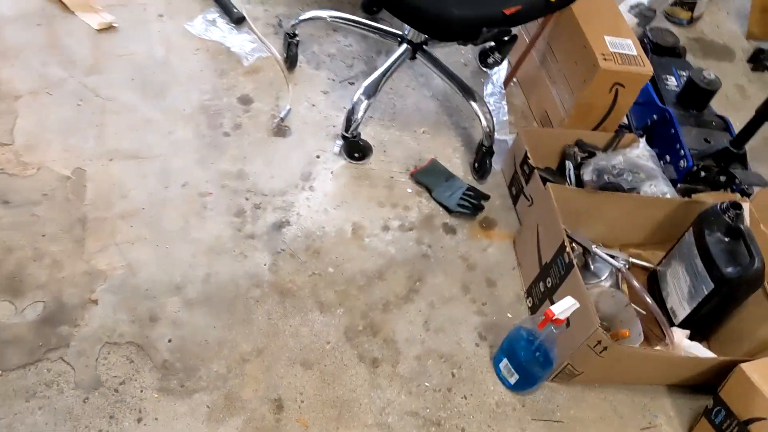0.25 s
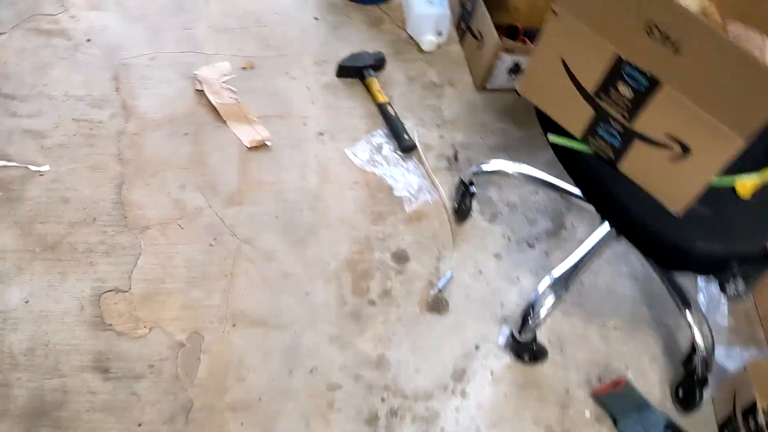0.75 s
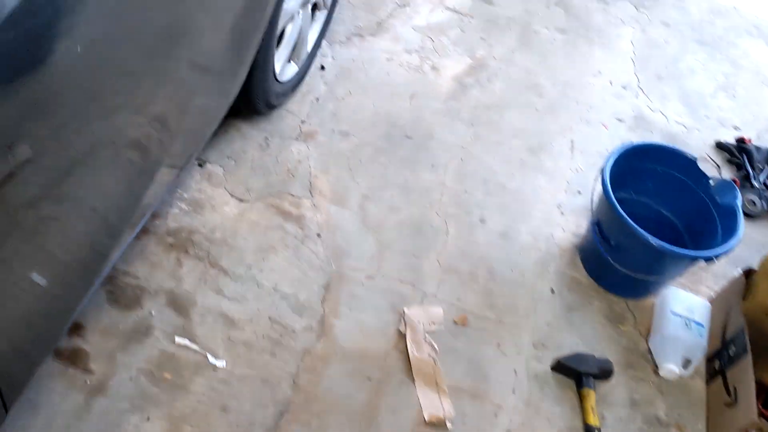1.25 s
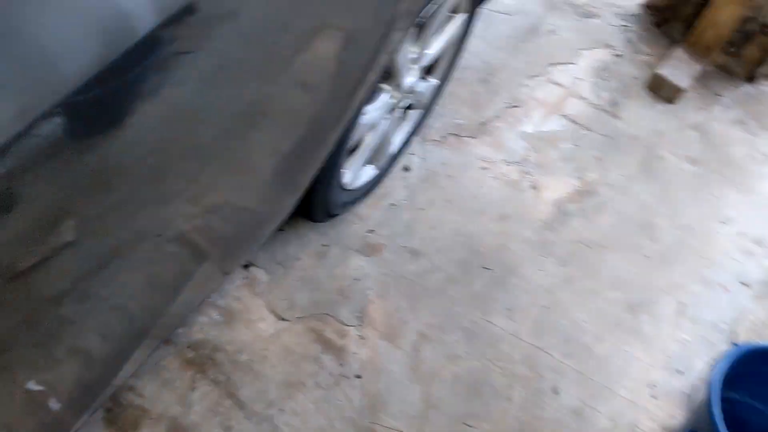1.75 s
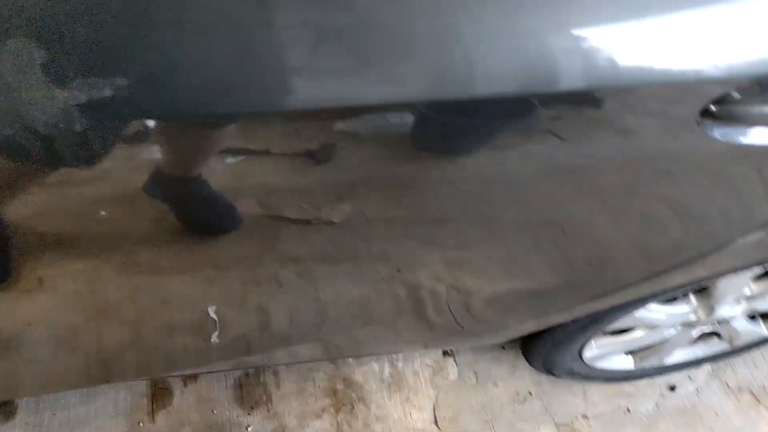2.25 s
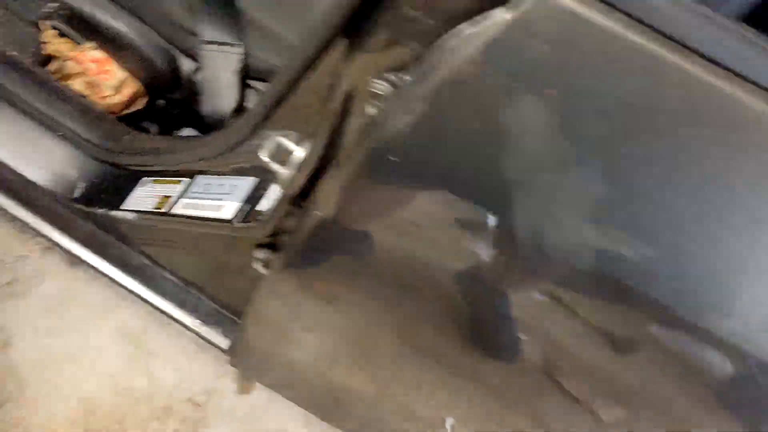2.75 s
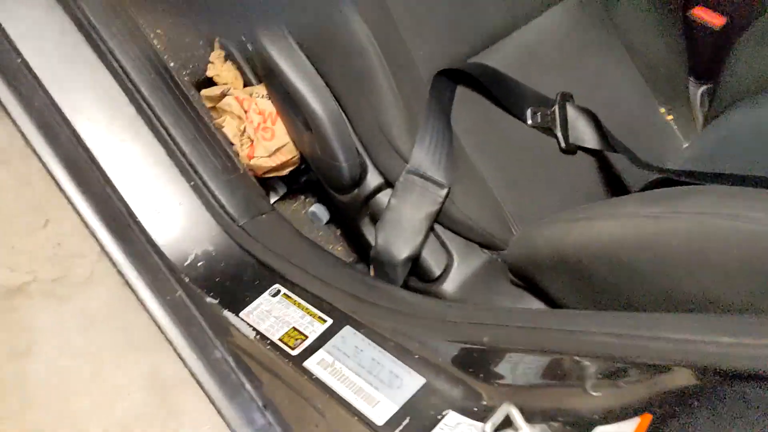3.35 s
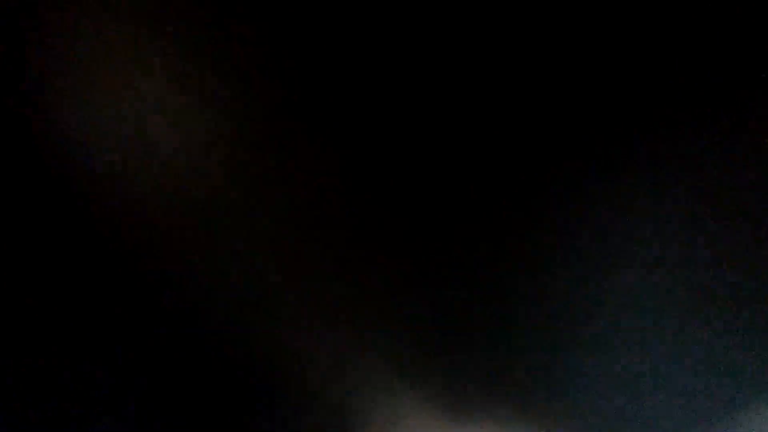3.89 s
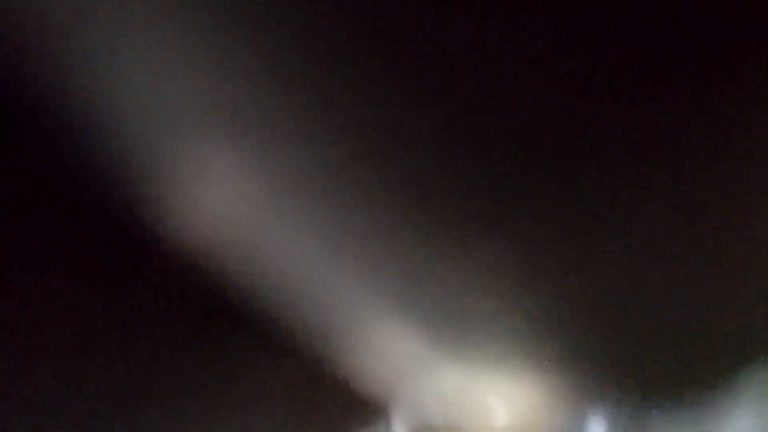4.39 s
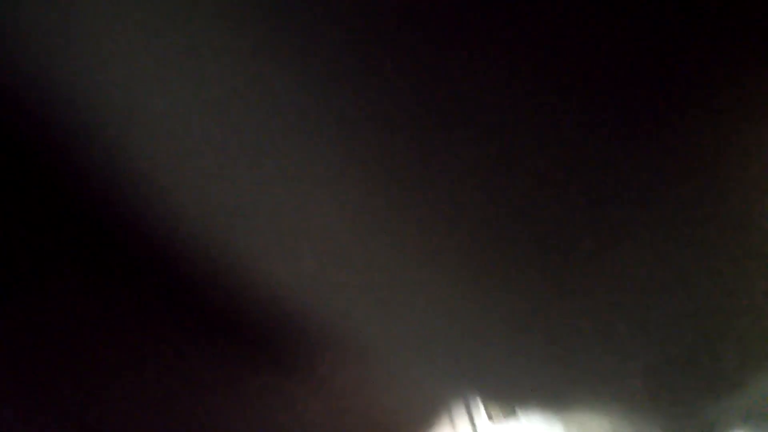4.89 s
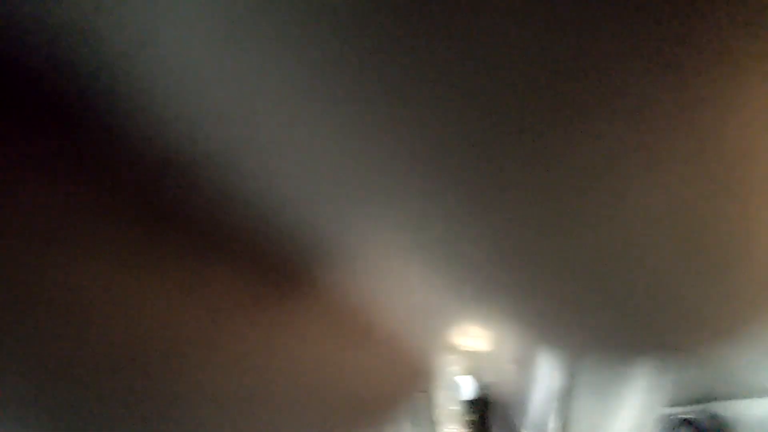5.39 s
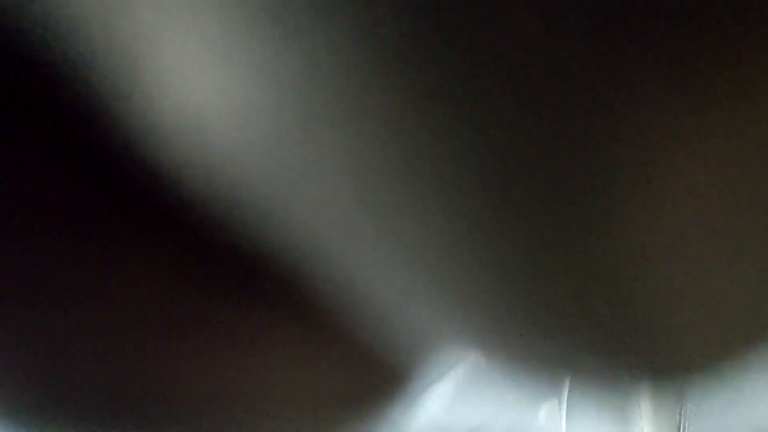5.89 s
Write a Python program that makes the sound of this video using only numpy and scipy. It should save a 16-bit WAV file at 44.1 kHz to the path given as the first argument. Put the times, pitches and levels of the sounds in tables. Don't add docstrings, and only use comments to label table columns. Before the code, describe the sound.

Someone walks lightly across a garage, clothes brushing and shoes ticking. Two solid clunks open a car door, with deep hollow resonance and a short puffing draught on the right. A dull bump and thick fabric rub mark leaning inside. Very near the microphone, a bunch of keys then rings in bright, high, quickly damped bursts, ending with sparse clicks and jingles over soft hiss.

```python
import sys
import numpy as np
from scipy import signal
from scipy.fft import rfft, irfft, next_fast_len
from scipy.io import wavfile

SR = 44100
rng = np.random.default_rng(int(sys.argv[2]) if len(sys.argv) > 2 else 0)


def master(y):
    cut = np.clip(np.atleast_2d(y).T, -1, 1)
    pcm = np.round(cut * 32767)
    wavfile.write(sys.argv[1], SR, pcm.astype(np.int16))


def undo_db(level):
    steps = np.asarray(level, float) / 20
    return 10 ** steps


N = 270333


def unit(x):
    return x / np.sqrt(np.mean(x ** 2) + 1e-20)


def ears(pan_db):
    return undo_db([[pan_db / 2], [-pan_db / 2]])


def in_time(rows, rest_db=-120):
    s, *columns = np.transpose(rows)
    return [np.interp(np.arange(N) / SR, s, c, rest_db, rest_db) for c in columns]


def at_hz(points, hz):
    points = np.array(points)
    return np.interp(np.log(hz), np.log(points[:, 0] + 1), points[:, 1])


def band(x, low_hz, high_hz):
    return signal.sosfilt(signal.butter(2, [low_hz, high_hz], "band", fs=SR, output="sos"), x)


def drift(rate_hz):
    r = np.exp(-80 * np.pi * rate_hz / SR)
    slow = signal.lfilter([1], [1, -2 * r, r * r], rng.standard_normal(N // 40 + 2002))[2000:]
    return np.interp(np.arange(N) / 40, np.arange(len(slow)), unit(slow))


def resonate(x, hz, width_hz):
    r = np.exp(-np.pi * width_hz / SR)
    zeros = np.array([1, 0, -1]) * (1 - r * r) / 2
    return signal.lfilter(zeros, [1, -2 * r * np.cos(2 * np.pi * hz / SR), r * r], x)


def body(x, peaks):
    return sum(undo_db(db) * resonate(x, hz, width_hz) for hz, width_hz, db in peaks)


def ring(clicks, hz, t60_s):
    r, w = undo_db(-60 / (t60_s * SR)), 2 * np.pi * hz / SR
    return signal.lfilter([0, np.sin(w)], [1, -2 * r * np.cos(w), r * r], clicks + 1e-18)


def grains(per_s, spread_db):
    sizes = unit(undo_db(spread_db * np.minimum(rng.exponential(1, N), 5)) * rng.choice([-1, 1], N))
    share = np.clip(per_s, 20, SR) / SR
    return sizes * (rng.random(N) < share) / np.sqrt(share)


def coloured(white, spectrum, patchy_db, likeness, tilt_db=0):
    low_end, high_end = spectrum[0][0], spectrum[-1][0]
    edges = np.geomspace(low_end, high_end, round(2 * np.log2(high_end / low_end)))
    out = 0
    for k, (low, high) in enumerate(zip(edges, edges[1:])):
        mid, side = band(white[k % 2], low, min(high, .45 * SR))
        hz = np.sqrt(low * high)
        alike = np.clip(at_hz(likeness, hz), -1, 1)
        tilt = tilt_db * np.clip(np.log2(hz / 3500), 0, 2) / 1.544
        gain = undo_db(at_hz(spectrum, hz) + patchy_db * drift(7.6) + tilt)
        out = out + gain * (np.sqrt(1 + alike) * mid + np.sqrt(1 - alike) * side * [[1], [-1]])
    return out


def swells(rows):
    start, rise, peak_db, fall = np.array(rows)[:, :4].T[:, :, None]
    late = np.arange(0, N + 32, 32) / SR - start - rise
    db = peak_db + np.where(late < 0, 14.5 * late / np.maximum(rise, 1e-3), -np.abs(fall) * late)
    return np.repeat(undo_db(db) * (late >= -rise), 32, axis=1)[:, :N]


# f/Hz, density/dB
RUMBLE = [(15, -67), (25, -12), (81, 6.5), (113, -3.5), (178, 8), (206, -14.5), (281, -9), (350, -30),
          (460, -72), (770, -120)]
# f/Hz, density/dB
HISS = [(150, 0.5), (250, -3.5), (541, 1.5), (964, -0.5), (1390, -14.5), (1550, -3), (2320, -10),
        (3590, -7), (4350, -12.5), (5660, -10.5), (13800, -17.5), (15700, -24), (16500, -43)]
# f/Hz, likeness/1
LIKENESS = [(60, 0.72), (180, 0.88), (550, 0.59), (1650, -0.09), (4970, 0.093), (15000, -0.18)]
# t/s, rise/s, peak/dB, fall/(dB/s)
SWAY = [
    (1.9, 0.16, -52, 32),
    (2.27, 0.45, -48.5, 86),
    (4.66, 0.053, -59.5, 50.5),
]
# t/s, rise/s, peak/dB, fall/(dB/s)
STIR = [
    (-.1, 0.068, -64, 42),
    (1.95, 0.31, -47.5, 72),
    (3.3, 0.57, -64.5, 38),
    (4.66, 0.17, -44.5, 79),
]
# f/Hz, width/Hz, level/dB, from/s, to/s
HUMS = [
    (178, 9.9, -81, 3.8, 5.4),
    (81.7, 7.8, -59.5, 0.02, 0.75),
    (4480, 110, -72, 0.092, 0.098),
    (4430, 48, -76, 0.59, 0.92),
    (7020, 350, -80, 2.2, 2.3),
    (1390, 51, -81.5, 0.11, 5.3),
]


def background():
    t = np.arange(N) / SR
    garage_db, cabin_db, inside_s = -61, -70.5, 1.5
    shield = np.clip((t - inside_s) / 0.25, 0, 1)
    rumble = undo_db(garage_db + (cabin_db - garage_db) * shield) + swells(SWAY).sum(0)
    air = undo_db(-65.5) + swells(STIR).sum(0)
    white = rng.standard_normal((2, 2, N))
    out = rumble * unit(coloured(white, RUMBLE, patchy_db=3.5, likeness=LIKENESS))
    out += air * unit(coloured(white, HISS, patchy_db=0.0, likeness=LIKENESS))
    motor_hz, motor_db, from_s, to_s = 173.5, -57, 0.54, 1.26
    on = np.interp(t, [from_s - .05, from_s, to_s - .3, to_s + 0.21], [0.36, 1.0, 0.89, 0.073])
    out += undo_db(motor_db + 2.0 * drift(4.4)) * on * np.sin(2 * np.pi * motor_hz * t)
    for hz, width_hz, db, start, end in HUMS:
        on = np.interp(t, [start - .1, start, end - .2, end + 0.43], [0, 1, 1, 0])
        hum = unit(resonate(resonate(white[0, 1], hz, width_hz), hz, width_hz))
        out += undo_db(db + 2 * drift(14.0)) * on * hum
    return out


# f/Hz, density/dB
CLOTH = [(150, -61), (250, 10), (373, -41), (538, 0), (938, -4.5), (1200, 3), (1580, -6.5), (2360, 0.5),
         (4120, -8.5), (7060, -13.5), (16000, -45.5)]
# t/s, rise/s, peak/dB, fall/(dB/s), brightness/dB
CLOTH_RUBS = [(-.2, 0.25, -46.5, 116, -4.5), (0.589, 0.03, -49.5, 118, 5.5), (.62, 0.17, -50, 107, 1),
              (1.297, 0.0065, -42.5, 178, 1), (1.454, 0.029, -46, 144, -3), (1.68, 0.082, -60.5, 502, 8),
              (1.903, 0.0022, -44, 162, -8), (2.024, 0.14, -46.5, 100, 4.5), (2.34, 0.0042, -46, 183, -115),
              (2.85, 0.01, -64, 347, 3.5), (2.37, 0.072, -51.5, 227, 16),
              (3.078, 0.026, -47.5, 545, 6), (3.291, 0.027, -54.5, 44, 5), (3.449, 0.074, -50, 701, 2.5),
             (3.584, 0.0058, -23.5, 364, -14.5), (3.699, 0.19, -43.5, 490, -6),
             (4.058, 0.021, -38.5, 256, -25), (4.613, 0.18, -29, 215, -2.5), (4.885, 0.0047, -22, 600, 7.5),
             (4.943, 0.065, -33.5, 395, 6), (5.14, 0.0042, -40, 162, -8), (5.22, 0.1, -58, 298, 21),
             (5.8, 0.056, -59.5, 55, -8), (6.07, 0.035, -60.5, 93.5, 29.5), (5.635, 0.02, -56, 494, 27)]
# t/s, left lag/samples, cloth left-right/dB
DIRECTION = [
    (0, 1, -14),
    (1.4, 8, -5),
    (1.6, 21.5, -10),
    (2.9, 14.5, -21.5),
    (4.3, 12.5, -3.5),
    (4.55, -12, -1),
    (6.13, -11.5, -15),
]


def rustle():
    rubs = CLOTH_RUBS
    strokes, pan_db = swells(rubs), in_time(DIRECTION)[1]
    rub = strokes.sum(0)
    bright_db = np.array(rubs)[:, 4] @ strokes / (rub + 1e-9)
    tilt_db = np.maximum(bright_db, -40) + 13.0
    white = np.array([[0.17 * grains(3000, spread_db=4.5) + rng.standard_normal(N) for ear in "ms"]
                      for draw in "ab"])
    likeness = [(300, 0.65), (8000, 0.028)]     # f/Hz, likeness/1
    out = coloured(white, CLOTH, patchy_db=2.0, likeness=likeness, tilt_db=tilt_db)
    return rub * undo_db(-8.0 + pan_db * [[.5], [-.5]]) * out / np.std(band(out[0], 950, 5320))


def placed(x):
    lag, n = in_time(DIRECTION)[0], np.arange(N)
    return np.array([np.interp(n - np.round(np.maximum(side * lag, 0)), n, ear)
                     for side, ear in zip((1, -1), x)])


# t/s, rise/s, peak/dB, fall/(dB/s)
SCUFFS = [(1.459, 0.0011, -45, 900), (1.468, 0.011, -59.5, 150), (3.085, 0.018, -53.5, 400),
          (4.06, 0.015, -61, 399), (5.265, 0.0092, -58, 397), (5.3, 0.01, -50, 213),
          (2.345, 0.0069, -56, 153), (3.59, 0.0095, -39, 210), (4.7, 0.093, -42.5, 300),
          (4.886, 0.0041, -38, 500), (-.01, 0.028, -49.5, 200), (3.777, .004, -51, 300),
          (5.84, .012, -61, 500)]


def scuffs():
    grit = grains(2500, spread_db=1.0) + .5 * rng.standard_normal((2, N))
    return swells(SCUFFS).sum(0) * unit(resonate(grit, hz=2250, width_hz=600))


# f/Hz, width/Hz, level/dB
KNOCK_BODY = [
    (161, 8.5, 3.5),
    (225, 49, 0),
    (480, 203, -1.5),
    (538, 11, -1),
    (697, 46, -6),
    (1020, 450, -11.5),
]
# f/Hz, width/Hz, level/dB
KNOCK_CRACK = [
    (1423, 120, -1.5),
    (1808, 244, 1),
    (2346, 22, -3.5),
    (3120, 440, -10),
    (4300, 1040, -1.5),
]
# t/s, crack/dB, body/dB, t60/s, left-right/dB
STEPS = [(0.0074, -42.5, -65, 0.37, 10), (0.519, -61, -66, 0.97, -4), (0.61, -46, -47.5, 0.2, 5.5),
         (0.6382, -69, -55.5, 0.32, -8), (0.7214, -33.5, -48.5, 0.077, -2), (0.7956, -48.5, -57, 0.27, 1),
         (1.303, -39, -53, 0.25, 4), (1.4104, -44, -52, 0.21, -1), (1.461, -43, -82, 0.026, -10),
         (1.5396, -48.5, -55, 0.17, 0), (1.572, -72, -51.5, 0.32, -1)]
# t/s, crack/dB, body/dB, t60/s, left-right/dB
LATCH = [(1.9116, -44, -25.5, 0.16, -2), (1.949, -38, -37, 0.32, -10), (2.0256, -21, -18, 0.1, -3.5),
         (2.0663, -59, -25.5, 0.11, 1), (1.9023, -44, -35.5, 0.054, 3), (2.099, -39, -53, 0.022, -8),
         (2.1306, -33.5, -49, 0.0053, 20), (2.1934, -32, -60, 0.015, 13), (2.29, -32, -31, 0.083, -5),
         (2.344, -17.5, -20.5, 0.11, -7.5), (2.372, -50, -25, 0.098, 9), (2.8684, -54, -67, 0.16, 0)]
# t/s, crack/dB, body/dB, t60/s, left-right/dB
CABIN = [(3.087, -39, -53, 0.3, 0), (3.216, -42, -62.5, 0.17, -3), (3.2998, -47, -57.5, 0.15, -9),
         (3.314, -52, -60, 0.31, -4), (3.5239, -61, -49, 0.019, -31), (3.588, -21, -24, 0.11, -8.5),
         (3.778, -30.5, -57, 0.14, -2), (3.8333, -30, -66, 0.028, -2), (3.888, -38, -35, 0.024, -9),
         (3.921, -55.5, -63, 0.53, -14), (4.0267, -51, -53, 0.072, -15), (4.062, -36.5, -60, 0.19, -8.5),
         (4.0894, -34, -71, 0.055, -6), (4.886, -36, -54, 0.12, -15), (5.141, -40.5, -65.5, 0.28, -19.5),
         (5.527, -53, -93, 0.096, -21.5)]
TOP_DB = [
    -22.5,
    -23.5,
    -18,
]


def knocks():
    t, out = np.arange(SR // 3) / SR, np.zeros((2, N + SR))
    blows = [(*row, row[1] + top_db) for rows, top_db in zip((STEPS, LATCH, CABIN), TOP_DB) for row in rows]
    for s, crack_db, body_db, t60_s, pan_db, top_db in blows:
        noise = rng.standard_normal((5, len(t)))
        noise *= 1 + 2.42 * np.exp(-t / 0.0038)
        noise[:, 0] += 8.0
        low = unit(band(body(noise[0], KNOCK_BODY) + 0.11 * noise[0], 286, 1020))
        low = low * (1 - np.exp(-t / 0.0036))
        mid = body(noise[1], KNOCK_CRACK) + 0.04 * noise[1]
        mid = unit(band(band(mid, 920, 3600), 900, 3570)) * (1 - np.exp(-t / 0.0012))
        top = unit(band(noise[2] + 2 * noise[3:], 3100, 15700))
        blow = undo_db(body_db - 60 * t / (1.22 * t60_s)) * low
        blow = blow + undo_db(crack_db - 11.0 - 60 * t / t60_s) * mid
        blow = blow + undo_db(top_db - 60 * t / (2.0 * t60_s)) * top
        at = round(s * SR)
        out[:, at:at + len(t)] += blow * ears(pan_db)
    return out[:, :N]


DOOR_PAN_DB = -4
# t/s, level/dB, f/Hz, t60/s
THUDS = [(0.523, -43, 181, 0.13), (.72, -40.5, 210, 0.1), (1.531, -42.5, 195, 0.19),
         (1.542, -44, 152.4, 0.14), (1.571, -36, 530, 0.019), (1.582, -45.5, 250, 0.097),
         (1.62, -49, 109, 0.19), (2.065, -16.5, 636, 0.073), (2.0743, -14.5, 390, 0.029),
         (2.084, -19.5, 227, 0.019), (2.102, -29, 167, 0.061), (2.107, -26, 327, 0.044),
         (2.13, -23.5, 98, 0.043), (2.361, -19.5, 232.3, 0.13), (2.38, -37, 342, 0.043),
         (2.396, -22, 186, 0.09), (2.712, -44, 570, 0.065), (2.815, -51, 573, .12), (3.079, -43, 567, .05),
         (3.59, -53, 179, 0.24), (3.611, -40, 236, 0.15), (4.988, -46, 161, 0.094), (5.24, -47.5, 484, .05),
         (2.3445, -22.5, 1760, .025), (2.026, -27.5, 1900, 0.027), (1.912, -26.5, 526, 0.063),
         (2.345, -14.5, 597, 0.045)]


def thuds():
    t, out = np.arange(SR // 4) / SR, np.zeros(N + SR)
    for s, db, hz, t60_s in THUDS:
        at = round(s * SR)
        swing = np.sin(2 * np.pi * hz * t) + 0.21 * np.sin(2 * np.pi * 1.7 * hz * t)
        out[at:at + len(t)] += undo_db(db - 60 * t / t60_s) * swing
    return out[:N] * ears(DOOR_PAN_DB)


# t/s, rise/s, peak/dB, fall/(dB/s)
SHIVERS = [(1.298, 0.011, -42, 245), (2.17, .025, -53, 500), (2.36, 0.064, -49.5, 253),
           (5.62, 0.044, -49, 700), (4.885, .004, -39, 500), (5.265, 0.019, -39, 300),
           (5.401, 0.0051, -45, 600), (4.731, 0.0052, -40, 399), (4.987, .006, -37, 500),
           (3.31, .012, -58, 300), (4.022, 0.01, -56, 900), (3.85, .04, -54, 600)]


def shivers():
    touch = grains(2500, spread_db=3.0) * rng.standard_normal((2, N))
    pitches_hz, sizes = rng.uniform(6500, 15600, 40), undo_db(rng.normal(0, 5, 40))
    modes = sum(size * ring(touch, hz, t60_s=.02) for hz, size in zip(pitches_hz, sizes))
    return swells(SHIVERS).sum(0) * unit(modes)


# t/s, peak/dB, left-right/dB
TICKS = [(1.4144, -41, -1.0), (1.4194, -46, -2.5), (2.1301, -27, -3.5), (2.1875, -28, -3.0),
         (2.1916, -21, -10), (2.6784, -55, -4), (2.685, -39.5, -7), (4.8873, -9, 4), (5.4999, -38, -8),
         (5.6226, -40, 3.5), (5.6414, -34, 1), (5.648, -25, 4), (5.6562, -27.5, -1), (6.1, -30.5, 9.5)]


def ticks():
    t, out, t60_s = np.arange(SR // 40) / SR, np.zeros((2, N + SR)), 0.0064
    for s, db, pan_db in TICKS:
        at = round(s * SR)
        tick = unit(band(rng.standard_normal(len(t)), 2940, 15500)) * undo_db(db - 8 - 60 * t / t60_s)
        out[:, at:at + len(t)] += tick * ears(pan_db)
    return out[:, :N]


# t/s, rise/s, peak/dB, fall/(dB/s)
SHUDDERS = [
    (1.97, 0.047, -36.5, 67),
    (2.276, 0.1, -31, 144),
    (2.8, 0.094, -52, 790),
    (1.76, 0.045, -52.5, 160),
    (3.2, 0.043, -57, 1300),
]
# t/s, rise/s, peak/dB, fall/(dB/s)
BOOMS = [
    (1.91, 0.051, -31.5, 75),
    (2.02, 0.059, -30.5, 209),
    (2.33, 0.091, -34.5, 100),
]


def door():
    heave, shudder = swells(BOOMS).sum(0), swells(SHUDDERS).sum(0)
    boom = unit(band(rng.standard_normal(N), 65, 220))
    panel = unit(band(body(grains(900, spread_db=1.0), KNOCK_BODY), 87, 1080))
    return (heave * boom + shudder * panel) * ears(DOOR_PAN_DB)


# t/s, snap/dB, swirl/dB
GUSTS = [
    (2.613, -32, -19.5),
    (2.6256, -12.5, -16.5),
    (2.644, -17.5, -12),
    (2.6524, -13, -31),
    (2.669, -39, -20.5),
    (2.6892, -8, -14),
    (2.745, -41, -29),
    (2.758, -39, -31),
    (2.776, -43, -35),
    (2.884, -64, -38),
]


def draught():
    out, t = np.zeros((2, N)), np.arange(-SR // 20, SR // 20) / SR
    snap_hz, snap_s = 250, 0.0016
    swirl_hz, swirl_s, swirl_late_s = 102.7, 0.0075, 0.00736
    chances = rng.standard_normal((len(GUSTS), 2))
    for (s, snap_db, swirl_db), (pitch, phase) in zip(GUSTS, chances):
        snap = np.exp(-np.abs(t / snap_s) ** 1.3) * np.cos(2 * np.pi * (snap_hz * t + .2 + .08 * phase))
        late = t - swirl_late_s
        swirl = np.exp(-(late / swirl_s) ** 2) * np.cos(2 * np.pi * swirl_hz * 2 ** (.2 * pitch) * late)
        at = round(s * SR) - len(t) // 2
        out[1, at:at + len(t)] += undo_db(snap_db) * snap - undo_db(swirl_db) * swirl
    return out


# t/s, short/dB, middle/dB, long/dB, share of free ring time before damping/1
STRIKES = [(4.617, -34, -49, -55, 0.4), (4.6245, -33, -46, -42, 0.15), (4.6633, -44, -55, -52, 0.29),
           (4.6833, -29, -38, -44, 0.62), (4.705, -25, -34, -44, 0.65), (4.733, -15, -38, -33, 0.38),
           (4.7412, -16, -40, -36, 0.27), (4.7518, -26, -43, -44, 0.25), (4.7716, -21, -29, -54, 0.36),
           (4.7845, -14, -28, -39, 0.31), (4.7912, -14, -28, -44, 0.78), (4.8024, -22, -44, -53, 0.35),
           (4.884, -24, -45, -30, 0.28), (4.8918, -27, -40, -48, 0.25), (4.9523, -11, -40, -38, 0.38),
           (4.9884, -8, -19, -24.5, 0.21), (4.9915, 0, -26, -30, 0.15), (5.0674, -29.5, -48, -55, 0.49),
           (5.089, -28, -49, -57, 0.3), (5.132, -51, -58, -67, 0.4), (5.152, -47, -56, -61, 0.35),
           (5.184, -29, -59, -58, 0.26), (5.22, -22.5, -41, -40, 1), (5.269, -14, -29, -32, 0.41),
           (5.2824, -5, -22, -30, 0.32), (5.2883, -33, -34, -27, 0.19), (5.2924, -3, -30, -47, 0.55),
           (5.3027, -41, -18, -38, 0.85), (5.328, -36, -20.5, -30.5, 0.68), (5.3626, -39, -49, -46, 0.21),
           (5.4025, -43, -43, -42, 0.35), (5.4056, -46, -36, -41.5, 0.51), (5.499, -43, -41.5, -55, 0.17),
           (5.6488, -33, -35, -62, 0.28), (5.657, -18.5, -29, -44, 0.23), (5.7846, -43, -63, -69, 0.38),
           (5.9188, -34, -40.5, -62, 0.26), (6.0347, -39, -56, -55.5, 0.65), (6.099, -33, -51, -59, 0.46),
           (6.1184, -23, -55, -46, 0.35)]
# f/Hz, level/dB, t60/s
SHORT_KEYS = [(13560, -18, .1), (13738, -7, .16), (14011, 0, .16), (14265, -13, .12), (14565, -16, .1),
              (14810, -22, .1), (15250, -21, .03), (15645, -20, .05)]
MIDDLE_KEYS = [(10225, -3, .15), (10520, -5, .12), (10850, -22, .06), (10100, -11, .04), (9245, -11, .08),
               (8765, -13, .18)]
LONG_KEYS = [(6178, 0, .18), (6442, -3, .15), (7014, -14, .12), (4899, -18, .15), (6081, -1, .06),
             (2370, -15, .05), (2100, -18, .05)]
SECOND_KEY_HZ = (13738, 14565, 10520)
# t/s, favour of second short key/dB, of second middle key/dB
HANG = [(4.62, -2, 0), (4.70, 2, 1), (4.745, 4, 3), (4.79, 4, -4), (4.83, 14, -11), (4.89, 6, 4),
        (4.95, 17, 3), (4.99, -2, -3), (5.07, -1, -2), (5.22, 8, 0), (5.275, 6, -4), (5.295, -10, 8),
        (5.33, -2, 1), (5.405, 4, -13), (5.65, 3, 4), (5.92, 4, -2.5), (6.1, 3, 0)]
# t/s, rise/s, peak/dB, fall/(dB/s)
SWINGS = [(4.66, 0.073, -37, 127), (4.73, 0.073, -26.5, 390), (4.955, 0.049, -27.5, 800),
          (4.885, 0.008, -25, 326), (5.064, 0.14, -45.5, 395), (5.23, 0.078, -33, 335),
          (5.4, 0.0062, -33.5, 381), (5.49, 0.1, -63, 150), (5.63, 0.03, -44, 476),
          (5.78, 0.065, -53.5, 349), (5.91, 0.0083, -48.5, 393), (6.04, 0.11, -54, 93)]
# level/dB, left-right/dB, strike/dB, share in swings/dB
KEYS_DB = [-1, -4, -5]
KEYS_PAN_DB = [14, -7.5, -4.5]
STRIKE_DB = [-7, 3.5, 4.5]
SWING_DB = [3, 0, -12]


def clatter(touch):
    out = 0
    for hz in np.linspace(5700, 15650, 30) + rng.normal(0, 90, 30):
        hits = touch[0] + touch[1:] * rng.choice([-1, 1], (2, 1))
        out = out + ring(hits, hz, t60_s=.03) * undo_db(10 * hz / 1e4)
    return unit(out)


def keys():
    t, out, shake = np.arange(SR // 6) / SR, np.zeros((2, N + SR)), swells(SWINGS).sum(0)
    patter = grains(1200, spread_db=2.6)
    touch = patter * rng.standard_normal((3, N))
    starts = [round(row[0] * SR) for row in STRIKES]
    for k, modes in enumerate((SHORT_KEYS, MIDDLE_KEYS, LONG_KEYS)):
        for hz, level_db, t60_s in modes:
            mode, favour_db = np.zeros(N + SR), np.zeros(N)
            if k < 2:
                favour_db = in_time(HANG, rest_db=2)[k] * (.5 if hz in SECOND_KEY_HZ else -.5)
            alive = unit(ring(patter * rng.standard_normal(N), hz, 0.21 * t60_s))
            mode[:N] = alive * shake * undo_db(SWING_DB[k] + level_db + favour_db - 6 + 4 * drift(25))
            chances = rng.standard_normal((len(STRIKES), 4))
            for row, at, (strength, detune, phase, damp) in zip(STRIKES, starts, chances):
                blow_db = row[k + 1] + level_db + 3 * np.clip(strength, -3, 1.5) + STRIKE_DB[k] + favour_db[at]
                damped_s = np.clip(row[4], .05, 1) * t60_s * 1.45 ** damp
                fade = undo_db(blow_db - 60 * t / damped_s) * (1 - np.exp(-t / 0.001)) ** 2
                mode[at:at + len(t)] += fade * np.sin(2 * np.pi * (hz * (1 + 0.00011 * detune) * t + phase))
            beam = rng.standard_normal()
            beamed = np.array([mode, np.roll(mode, round(3 * beam))])
            out += undo_db(KEYS_DB[k]) * ears(KEYS_PAN_DB[k] + beam) * beamed
    parts, burst = clatter(touch), np.zeros(N + SR)
    for row, at in zip(STRIKES, starts):
        crack_db = -26.5 + 0.36 * row[1]
        burst[at:at + len(t)] += undo_db(crack_db - 60 * t / 0.014) * (1 - np.exp(-t / 0.00049))
    return out[:, :N] + parts * (burst[:N] + shake * undo_db(-8.0)) * ears(4)


def garage(x):
    t60_s, wall_cut_hz = 0.34, 22000
    size = next_fast_len(N + SR)
    bins = np.arange(size // 2 + 1)
    turn = -2j * np.pi * bins / size
    dull = 1 / (1 + 1j * bins * SR / size / wall_cut_hz) ** 0.93
    lags = rng.integers(300, 1500, 16)
    loops = [undo_db(-60 * lag / SR / t60_s) * dull * np.exp(turn * lag) for lag in lags]
    echoes = [sum((-1) ** k * g / (1 - g) for k, g in enumerate(loops[ear::2])) for ear in (0, 1)]
    return irfft(rfft(x, size) * np.array(echoes), size)[:, :N]


def scene():
    near = knocks() + door() + keys() + rustle() + thuds() + scuffs()
    lean_in_s, cabin_wet_db = 4.3, -7.5
    wet = undo_db(np.interp(np.arange(N) / SR, [lean_in_s, lean_in_s + 0.22], [0, cabin_wet_db]))
    around = undo_db(-19.5) * garage(wet * near.mean(0)) + draught() + background()
    return placed(near + ticks() + shivers()) + around


# f/Hz, width/Hz, level/dB
CASE = [
    (1323, 173, -4),
    (2260, 220, 3.5),
]


def band_limit(x):
    return signal.sosfilt(signal.butter(12, 16800, fs=SR, output="sos"), x)


def record(dry):
    x = signal.sosfilt(signal.butter(2, 45, "high", fs=SR, output="sos"), dry + body(dry, CASE))
    x = signal.sosfilt(signal.ellip(8, .5, 36, 15750, fs=SR, output="sos"), x)
    return band_limit(x)


dry = scene()
out = record(dry)
master(out)
```